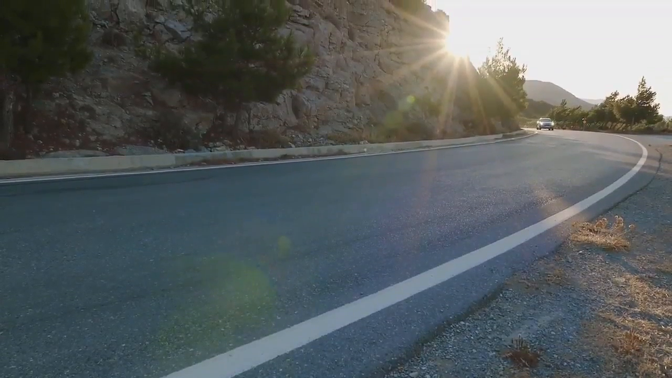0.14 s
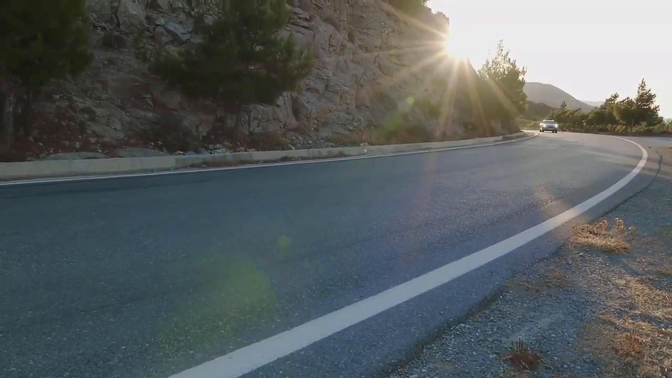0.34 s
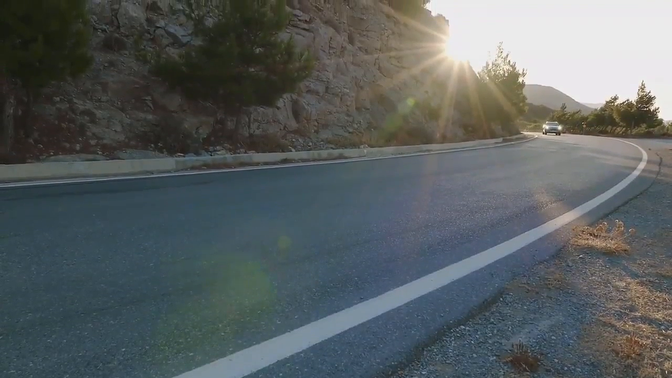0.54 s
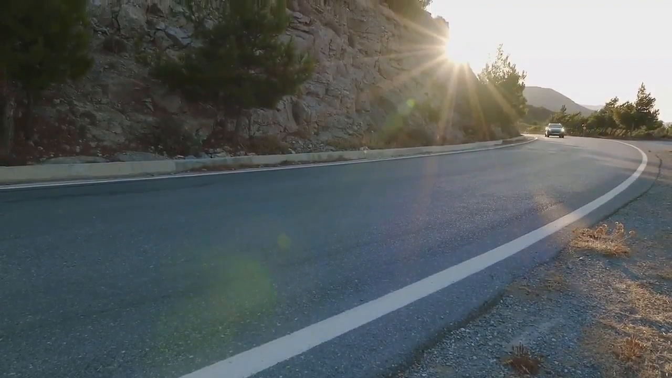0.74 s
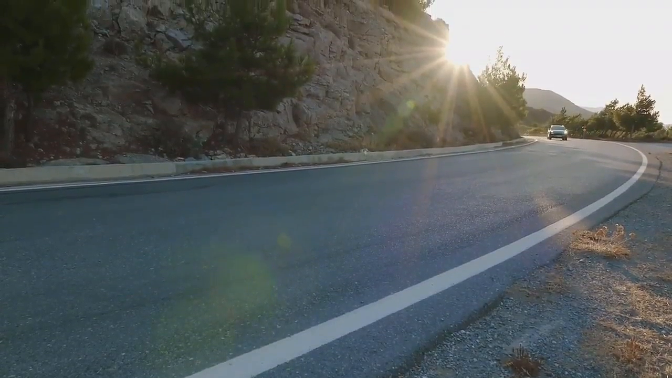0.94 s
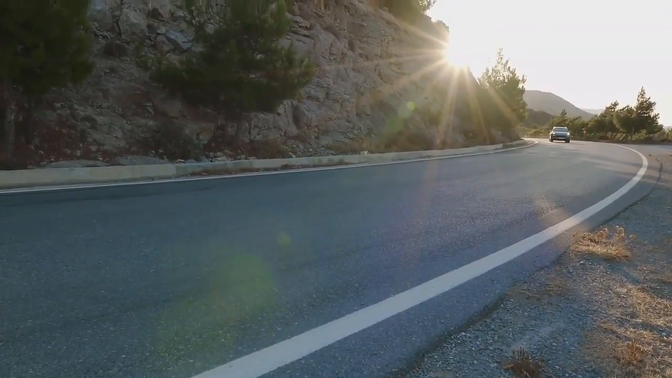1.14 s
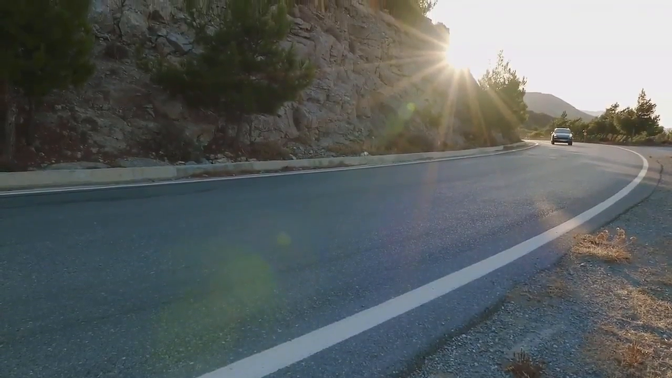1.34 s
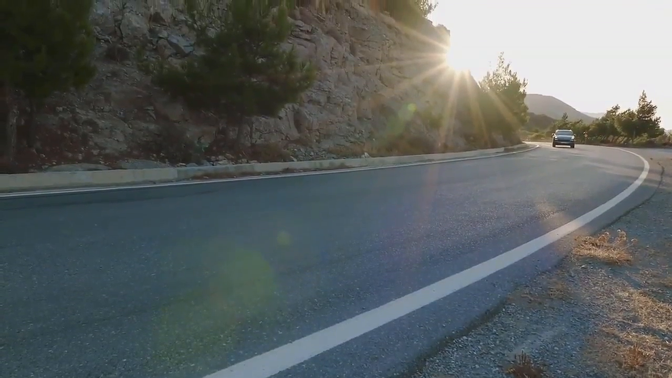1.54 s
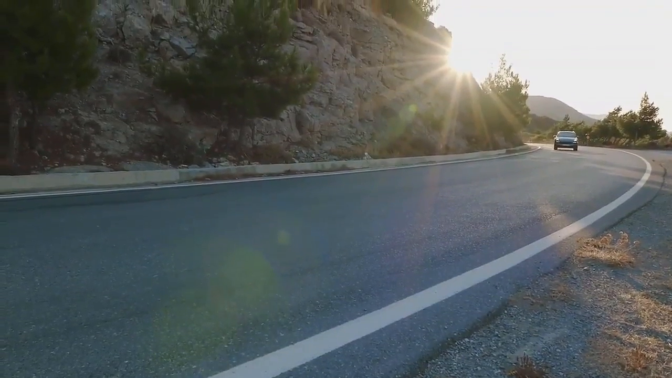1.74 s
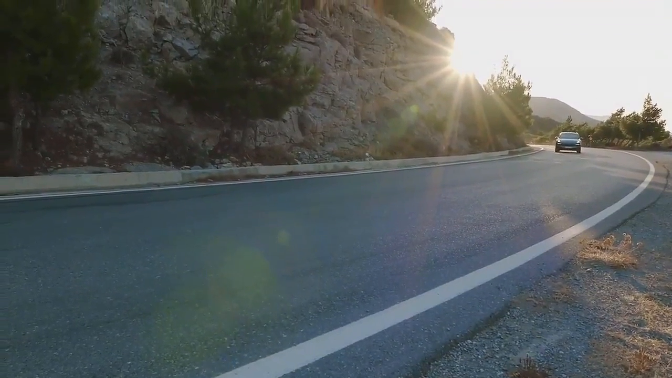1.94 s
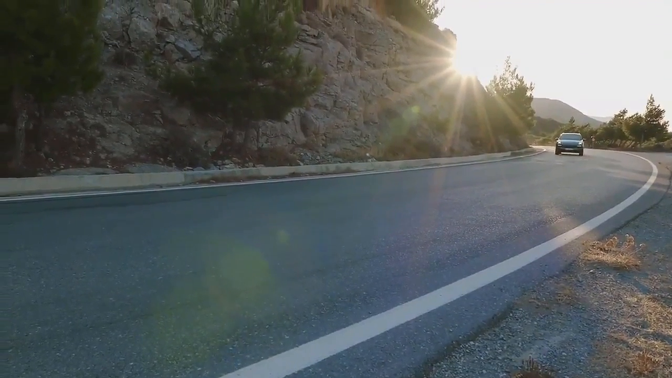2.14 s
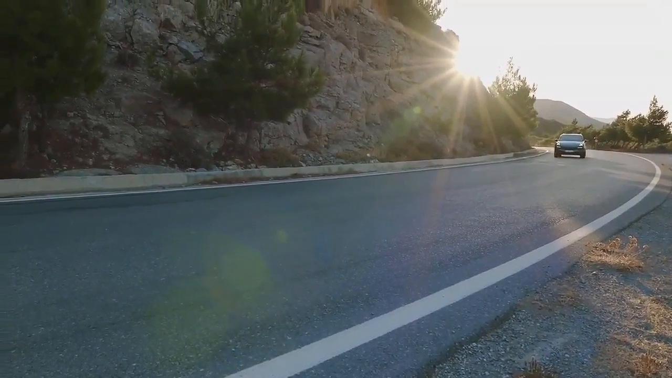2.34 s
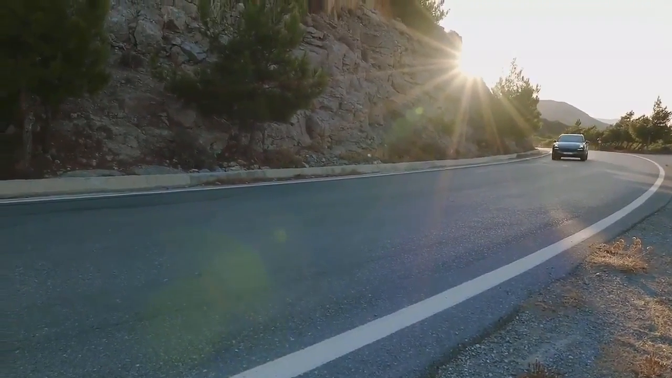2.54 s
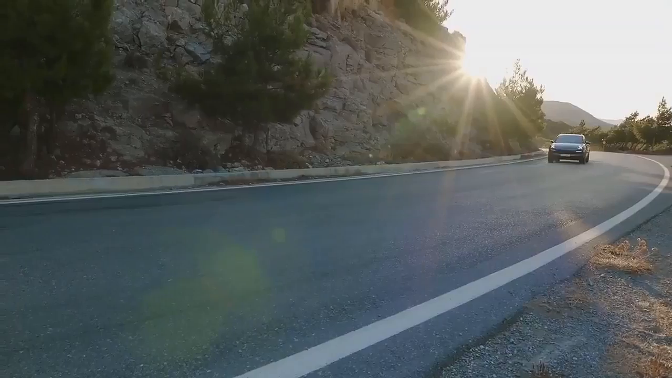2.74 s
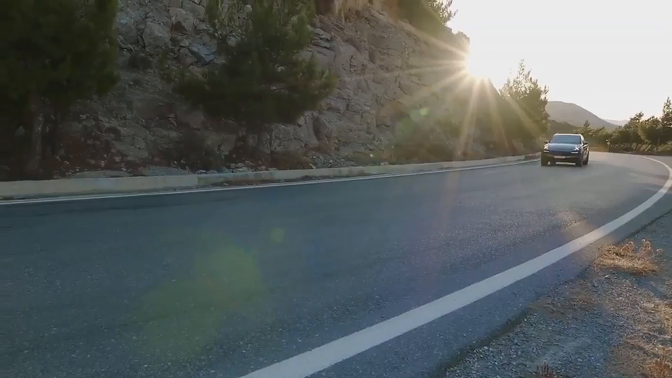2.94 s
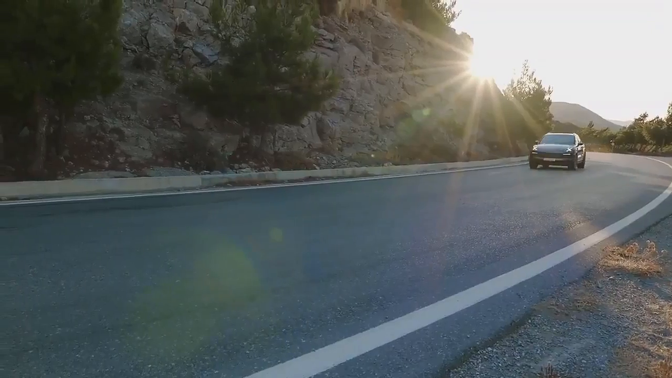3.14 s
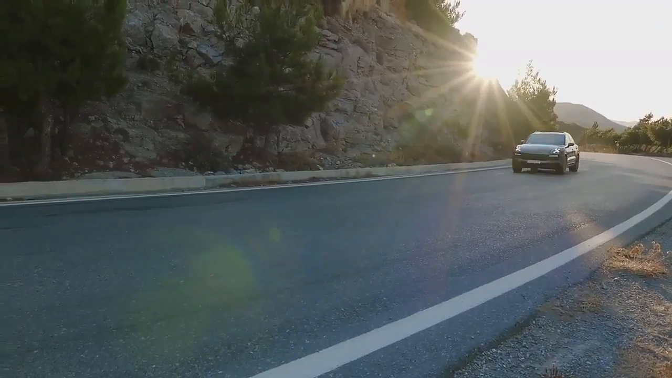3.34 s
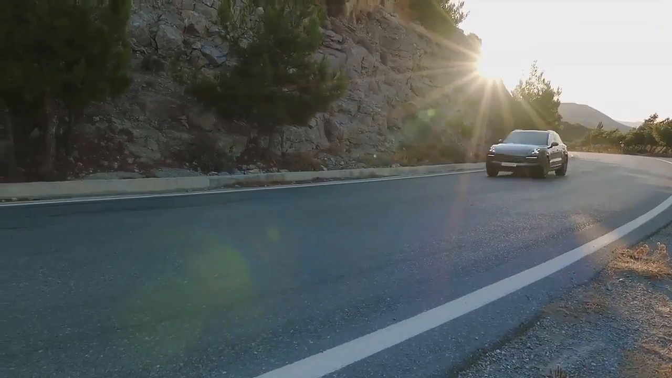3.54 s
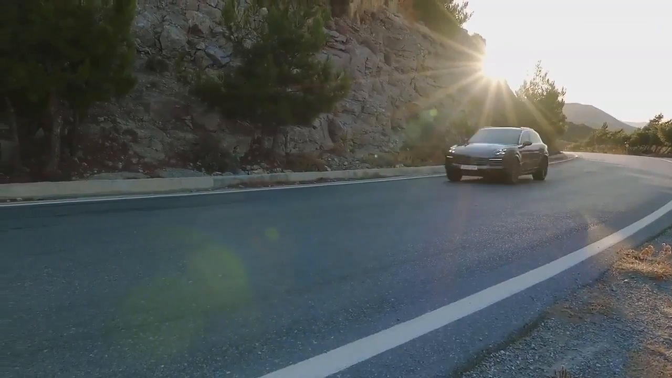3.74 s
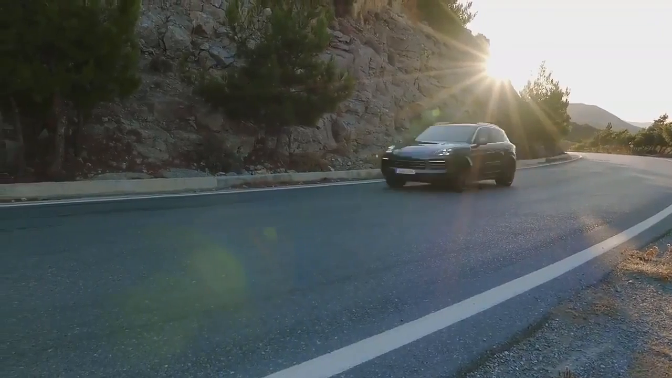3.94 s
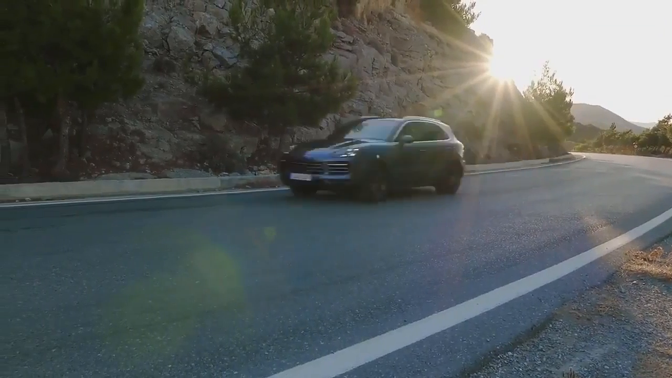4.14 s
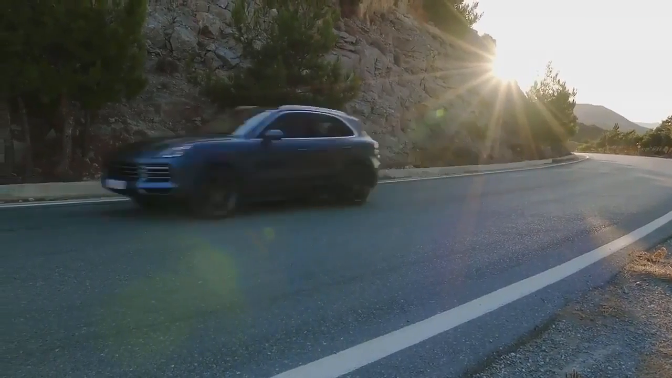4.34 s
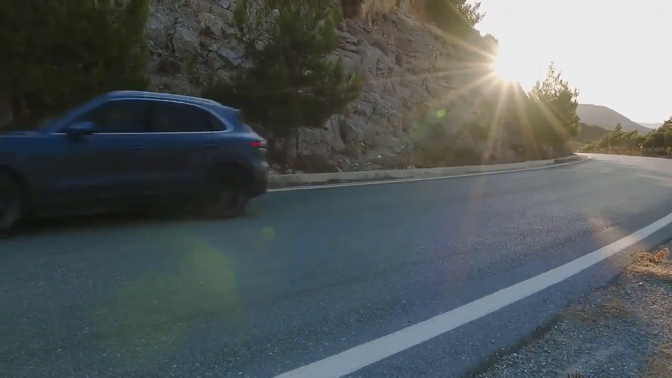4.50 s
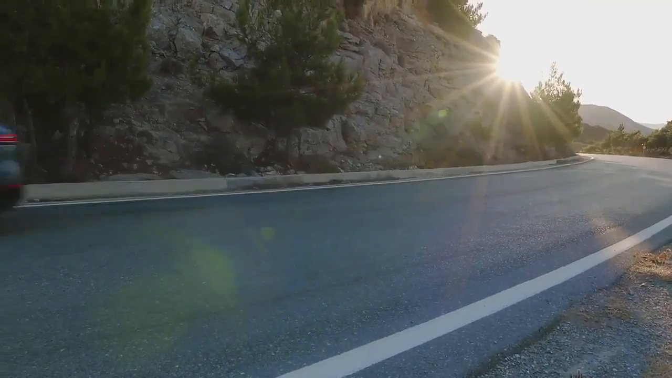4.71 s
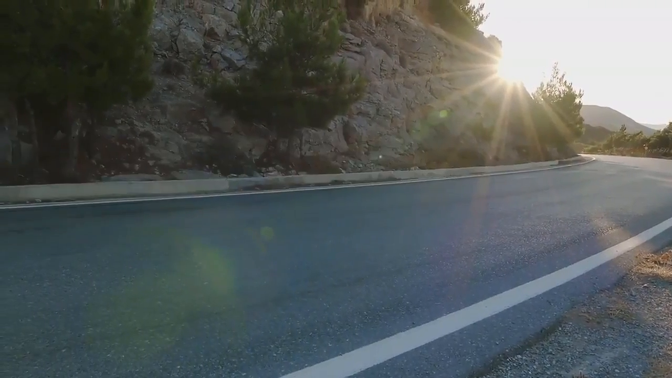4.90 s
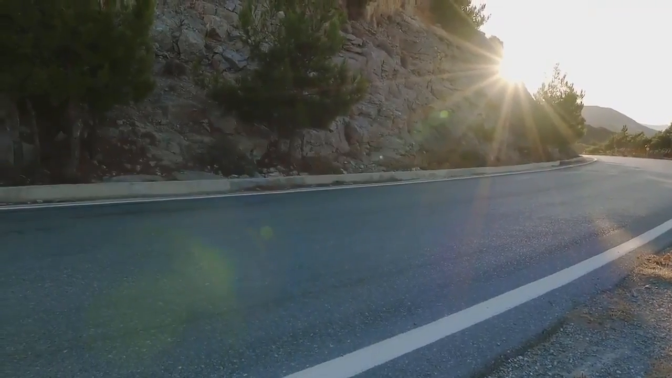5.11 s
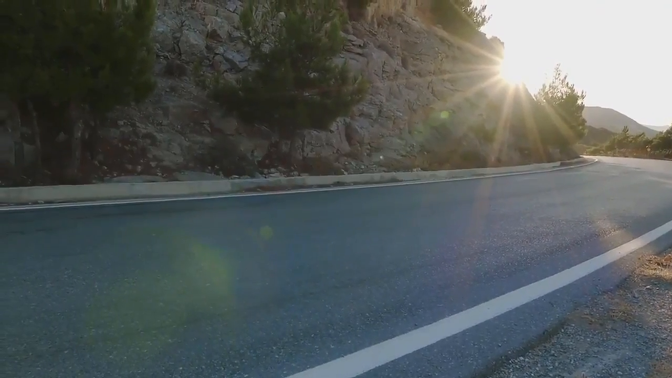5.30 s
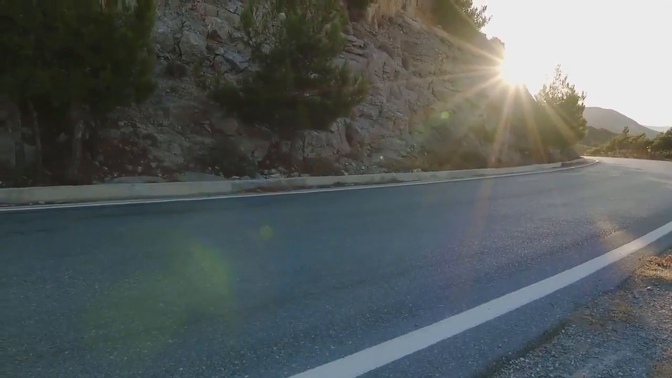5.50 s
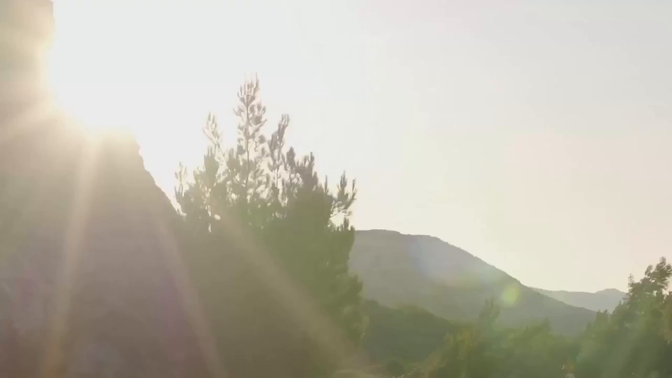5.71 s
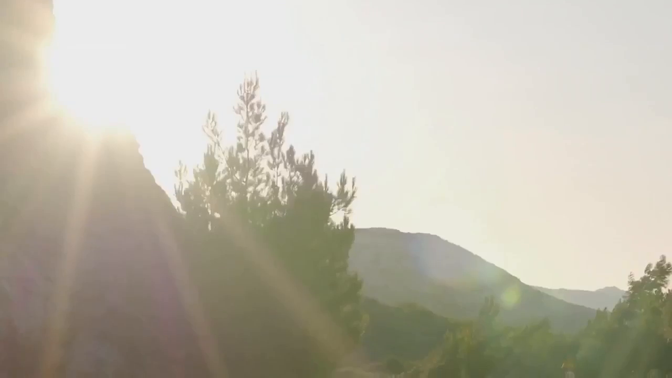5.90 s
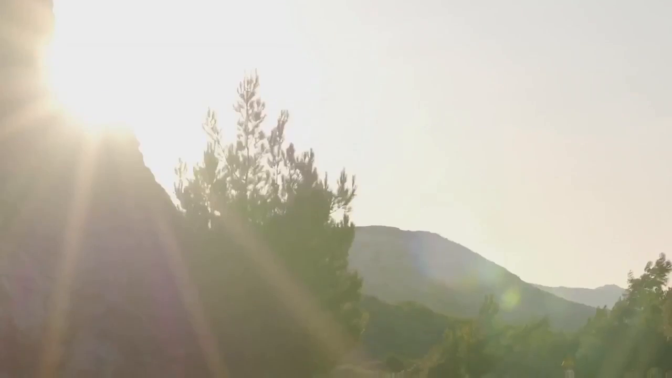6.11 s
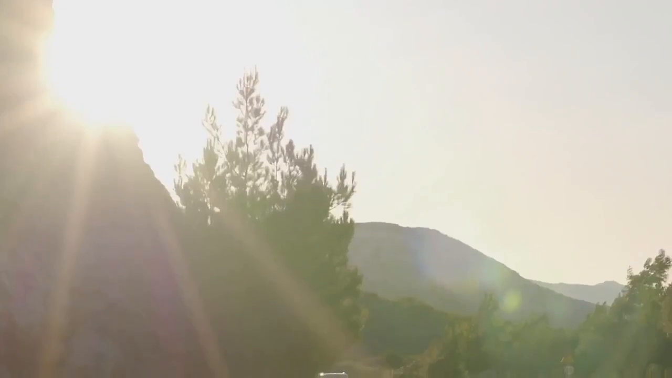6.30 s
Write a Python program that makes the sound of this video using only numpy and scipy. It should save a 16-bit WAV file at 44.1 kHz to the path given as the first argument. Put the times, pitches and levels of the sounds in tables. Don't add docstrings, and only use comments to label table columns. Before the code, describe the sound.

A heavy car sweeps round a roadside bend, tyre roar swelling to a peak and sinking away, then a stone tick and a quieter distant hum.

```python
import sys
import numpy as np
from scipy import signal
from scipy.fft import rfft, irfft, next_fast_len
from scipy.io import wavfile
from scipy.ndimage import uniform_filter1d, map_coordinates

SR = 44100
rng = np.random.default_rng(int(sys.argv[2]) if len(sys.argv) > 2 else 0)


def inscribe(sig):
    pcm = np.round(np.clip(np.atleast_2d(sig).T, -1, 1) * 32767)
    wavfile.write(sys.argv[1], SR, pcm.astype(np.int16))


def gain_from_decibels(decibels):
    exponent = np.asarray(decibels, float) / 20
    return 10 ** exponent


N = 280476
T = np.arange(N) / SR

# (time [s], level [dB], clearness of the path past rock, verge and body [dB])
TYRE_LEVEL = [(0, -36.5, 5.5), (.45, -35.5, 5.5), (.8, -33, 4), (1.15, -32.5, -1), (1.7, -32.5, -2),
              (2.1, -32.5, 0.5), (2.5, -29.5, 3), (3.0, -28.5, 2), (3.5, -25, 0.5), (4.0, -21, 1.5),
              (4.15, -21.5, 0.5), (4.3, -19.5, -2.5), (4.5, -18, -0.5), (4.78, -19.5, 0), (4.93, -22.5, 2),
              (5.1, -23.5, -3.5), (5.4, -27.5, -2.5), (5.68, -31, -5)]
# (time [s], level [dB], treble tilt [dB per octave])
CHIP_HITS = [
    (5.5040, -33, 0),
    (5.5066, -36, -2),
    (5.5085, -50, 0),
    (5.5112, -52, 2),
    (5.5148, -54, 5),
]
FADE_END_S, FADE_S = 5.89, 0.28


def curves(table):
    s, *columns = np.transpose(table)
    return [np.interp(T, s, column) for column in columns]


def swells(t, table):
    return sum(db * np.exp(-((t - at) / width) ** 2) for at, width, db in table)


def walk(rate_hz):
    hold = int(SR / rate_hz)
    steps = np.repeat(rng.standard_normal(N // 100), hold)[:N]
    return 1.194 * uniform_filter1d(uniform_filter1d(steps, hold), hold)


def roar(colour, flicker_db, rate_hz, loss_db_khz=0.):
    size = next_fast_len(N)
    octave = np.log2(np.maximum(np.arange(size // 2 + 1) * SR / size, 1))
    hz, db = np.transpose(colour)
    gain = gain_from_decibels(np.interp(octave, np.log2(hz), db, left=-90, right=-90))
    spectrum = rfft(rng.standard_normal(size)) * gain
    power = np.mean(irfft(spectrum, size) ** 2)
    out = 0
    for centre in np.arange(np.log2(hz[0]), np.log2(hz[-1]) + .5, .5):
        window = np.cos(np.pi * np.clip(octave - centre, -.5, .5)) ** 2
        band_db = flicker_db * walk(rate_hz) - loss_db_khz * max(2 ** centre / 1000 - 4, 0)
        out = out + gain_from_decibels(band_db) * irfft(spectrum * window, size)[:N]
    return out / np.sqrt(power)


def ring(s, hz, db, t60_s, push_s):
    start = int(np.ceil(s * SR))
    age = np.arange(start, min(start + int(2 * t60_s * SR), N)) / SR - s
    envelope = (1 - np.exp(-age / push_s)) * np.exp(-np.log(1000) * age / t60_s)
    out = np.zeros(N)
    out[start:start + len(age)] = gain_from_decibels(db) * envelope * np.sin(2 * np.pi * hz * age)
    return out


def slice_filter(x, order, edges_hz):
    return signal.sosfilt(signal.butter(order, edges_hz, "band", fs=SR, output="sos"), x)


def motion():
    speed_m_s, passes_s, kerb_m, pitch_abeam = 17, 4.6, 7, 0.98
    along = speed_m_s * (T - passes_s)
    cosine = along / np.hypot(along, kerb_m)
    pitch = pitch_abeam - cosine * speed_m_s / 343
    return np.maximum(-along, 0), np.maximum(along, 0), (1 + cosine) / 2, pitch


def beam(abeam_db, ahead_db_10m, behind_db_10m, away_db, clear_share):
    ahead, behind, away, _ = motion()
    level_db, clear_db = curves(TYRE_LEVEL)
    distance_db = (ahead_db_10m * ahead + behind_db_10m * behind) / 10
    return level_db + abeam_db + distance_db + away_db * away + clear_share * clear_db


def horn():
    # (frequency [Hz], density [dB per Hz])
    colour = [(400, -18.5), (550, -3.5), (680, -2), (800, -4.5), (900, -1.5), (1050, -1.5), (1300, -17.5),
              (1700, -12)]
    # (time [s], width [s], change [dB])
    openings = [(.3, 0.22, 0.5), (2.2, 0.15, 1), (3.75, 0.049, -6.5), (4.22, 0.14, 2.5), (3.2, 0.11, -0.5),
                (3.95, 0.092, -2), (4.45, .1, -1.5), (4.6, 0.06, 1), (5.12, .08, -6), (5.7, 0.063, 3)]
    return roar(colour, 2.6, 22), beam(-4.5, 0.2242, -0.6, -0.4, -0.5) + swells(T, openings)


def groove():
    # (frequency [Hz], density [dB per Hz])
    colour = [(600, -31), (700, -8.5), (750, -0.5), (810, -1.5), (870, -0.5), (920, -5), (980, -13.5),
              (1150, -35)]
    # (time [s], pitch factor)
    bend = [(0, 1.02), (.75, 1.03), (1.05, .97), (1.4, 1.01), (2.1, 0.97), (2.7, .99), (3.4, 1.01),
            (4.2, 1.013), (6.36, 1.0)]
    # (time [s], width [s], change [dB])
    sweeps = [(.65, 0.12, 2), (.92, 0.25, 2.5), (1.95, 0.27, 3.5), (2.8, 0.089, 2.5), (3.2, 0.49, 1),
              (4.15, 0.13, 4), (4.5, .06, 2.5), (4.76, .06, -5)]
    place = np.cumsum(curves(bend)[0])
    note = map_coordinates(roar(colour, 0.7, 24.63), [place], order=1, mode="mirror")
    return note, beam(-5.5, 0.3, -2, -3.5, -0.3) + swells(T, sweeps)


def rumble():
    # (frequency [Hz], density [dB per Hz])
    colour = [(40, -68), (100, -27), (160, -15), (220, -2), (320, -1.5), (450, -2), (600, -2), (800, -3.5),
              (1100, -41)]
    # (time [s], width [s], change [dB])
    rock = [(.6, 0.16, 1.5), (2.15, 0.24, 2.5), (3.75, 0.086, 2.5), (4.38, 0.16, 2), (4.6, 0.051, -1),
            (4.93, 0.064, 6.5), (5.15, 0.051, -5)]
    return roar(colour, 0.63, 17.0), beam(-5.5, -0.13, -1.5, 0.5, -0.65) + swells(T, rock)


def tread_beam():
    return beam(-5.5, 0.4228, -0.5, 0.5, -0.14)


def tread():
    # (frequency [Hz], density [dB per Hz])
    colour = [(800, -16.5), (1100, 3.5), (1300, 3.5), (1550, 2), (1800, -2), (2200, -9), (2800, -11.5),
              (3600, -25.5)]
    # (time [s], width [s], change [dB])
    openings = [(.1, 0.27, 1.8), (1.25, .1, -0.3), (3.2, 0.26, -1.5), (3.75, 0.12, -0.3), (4.2, 0.15, -0.5),
                (4.45, 0.061, 0.4), (4.8, 0.18, -2.3), (5.85, .06, 5), (2.7, 0.1, 0)]
    return roar(colour, 0.45, 13), tread_beam() + swells(T, openings)


def hiss():
    # (frequency [Hz], density [dB per Hz])
    colour = [(1800, -9), (2600, -1.5), (3200, -1), (3800, -1.5), (4500, -6), (5200, -9.5), (7000, -14.5),
              (10000, -21.5), (13000, -27), (15500, -34)]
    # (time [s], width [s], change [dB])
    openings = [(.05, 0.1, -3.5), (.85, .15, -1), (1.3, 0.18, -2), (3.2, .12, 0), (4.0, .08, 0),
                (4.4, 0.14, 2.5), (5.15, 0.06, -1), (5.6, .12, 1)]
    # (time [s], width [s], treble kept [dB per kHz])
    sheen = [(.2, .15, -0.5), (1.0, 0.36, 0), (1.9, 0.42, 0.55), (2.7, .25, 0), (4.25, 0.23, 0.23),
             (5.0, 0.13, -.5), (5.75, .1, 0.7)]
    ahead, _, away, _ = motion()
    loss_db_khz = 0.42 * ahead / 10 + 0.07 * away + 0.02 * curves(TYRE_LEVEL)[1] - swells(T, sheen)
    return roar(colour, 0.81, 10, loss_db_khz), beam(-17.5, -0.44, -3.5, 4, 0.78) + swells(T, openings)


def wake():
    # (frequency [Hz], density [dB per Hz])
    colour = [(1500, -20), (1900, 3.5), (2300, 1), (2900, -7.5), (3300, -10), (3800, -30.5)]
    # (time [s], width [s], change [dB])
    openings = [(.1, .3, -3), (1.15, .12, -3), (3.4, .2, -3), (4.8, .08, -0.5), (5.15, .08, -1.5),
                (5.5, .15, 2), (5.78, .06, -3)]
    away = motion()[2]
    away_db = 20 * np.log10(np.clip(away + 0.099, .02, 1) ** 0.51)
    return roar(colour, 0.55, 7.8), tread_beam() + swells(T, openings) - 7 + away_db


def tyres():
    asphalt_ms, asphalt_share, grazing_m = 0.092, 0.52, 120
    ahead, _, _, pitch = motion()
    place = np.cumsum(pitch)
    direct = 0
    for sound, level_db in (horn(), groove(), rumble(), tread(), hiss(), wake()):
        direct = direct + gain_from_decibels(level_db) * map_coordinates(sound, [place], order=3, mode="mirror")
    fade = np.clip((FADE_END_S - T) / FADE_S, 0, 1) ** 1.06
    direct = direct * gain_from_decibels(0.57 * walk(30)) * fade
    late = map_coordinates(direct, [np.maximum(np.arange(N) - asphalt_ms * SR / 1000, 0)], order=3)
    share = np.clip(asphalt_share * np.tanh(ahead / grazing_m), 0, .9)
    return (direct + share * late) / np.sqrt(1 + share ** 2)


def bumps():
    # (time [s], peak level [dB], frequency [Hz])
    joints = [(1.752, -13, 760), (2.291, -16, 900), (2.341, -15, 834), (2.586, -10.5, 792),
              (3.314, -12, 877), (3.639, -16, 781), (4.0, -8, 920), (4.446, -7.5, 894), (4.652, -8, 988),
              (2.895, -8.5, 833), (3.493, -2.5, 853), (3.695, -6.5, 760.6), (3.852, -3.5, 737),
              (4.041, -5.5, 850), (4.138, -6.5, 910), (4.279, -10, 840), (4.305, -4, 683),
              (4.534, -5, 643.4), (4.76, -3.5, 786), (4.781, -3.5, 920)]
    return sum(ring(s, hz, db, t60_s=0.032, push_s=0.0032) for s, db, hz in joints)


def narrow_swells():
    # (time [s], width [s], frequency [Hz], level [dB])
    flashes = [(.95, .3, 5240, -67), (1.2, .08, 5500, -67), (.05, .06, 4300, -65), (1.8, .2, 3500, -61),
               (2.4, .1, 4400, -61), (3.0, 0.22, 3660, -53.5), (4, .08, 2400, -42), (4.25, .1, 3500, -48),
               (4.3, .12, 6000, -52), (4.55, 0.069, 1770, -30), (4.85, .08, 4700, -47),
               (5.0, .05, 3000, -46), (5.3, 0.055, 3000, -52), (5.64, .07, 3000, -54),
               (5.68, .08, 1100, -39), (5.62, .12, 600, -38.5), (5.7, .06, 2700, -55),
               (3.7, .1, 1100, -33.5), (4.4, .1, 560, -30), (5.95, .06, 217, -50), (.9, .8, 7100, -77),
               (1.0, .15, 790, -37), (5.42, .1, 1100, -38), (4.55, .1, 7400, -52), (5.45, 0.14, 2760, -50),
               (2.55, .3, 11700, -82), (3.7, .25, 13200, -76)]
    white = rng.standard_normal(N)
    out = 0
    for s, width, hz, db in flashes:
        edges_hz = hz * 2 ** (0.18 * np.array([-1, 1]))
        band = slice_filter(white, 2, edges_hz) / np.sqrt(2 * np.ptp(edges_hz) / SR)
        out = out + gain_from_decibels(db) * np.exp(-((T - s) / width) ** 2) * band
    return out


def narrow_dips(x):
    # (time [s], width [s], frequency [Hz], change [dB])
    dips = [(.04, .1, 2800, -6), (0.37, .2, 3000, -1.5), (1.15, .12, 3100, -2.5), (1.12, 0.081, 1600, -2),
            (.9, 0.13, 620, -2.5), (2.7, 0.13, 970, -1), (3.62, .1, 218, -2.5), (4.2, 0.13, 1400, -2),
            (4.65, .1, 290, -3.5), (4.4, 0.042, 1320, -1.5), (5.15, 0.049, 620, -2),
            (5.15, 0.061, 1600, -2), (5.93, .07, 1300, -5), (6.27, .1, 390, -4.5), (6.25, .08, 2800, -2),
            (6.15, .2, 660, -3), (5.1, .1, 6800, -4), (5.65, .12, 3600, -4), (3.92, .1, 290, -2),
            (3.23, 0.11, 560, -2.5), (4.0, .08, 6300, -1.5), (1.75, .3, 1950, -1.5)]
    for s, width, hz, db in dips:
        band = slice_filter(x, 1, hz * 2 ** (0.28 * np.array([-1, 1])))
        x = x + (gain_from_decibels(db * np.exp(-((T - s) / width) ** 2)) - 1) * band
    return x


def engine():
    # (time [s], level [dB])
    load = [(0, -75), (1.2, -57.5), (2, -52.5), (2.6, -57), (3.6, -53), (4.4, -60), (5.2, -42.5),
            (5.7, -63), (5.9, -85)]
    # (multiple of the firing rate, level [dB])
    orders = [(1, -14), (2, -1), (3, -22)]
    firing_hz = 98.9 * motion()[-1]
    db = curves(load)[0]
    phase = 2 * np.pi * np.cumsum(firing_hz * (1 + 0.01164 * walk(12))) / SR
    return sum(gain_from_decibels(db + order_db + 0.99 * walk(4.5)) * np.sin(k * phase) for k, order_db in orders)


def chip():
    # (frequency [Hz], level [dB])
    modes = [(5900, -0.5), (7100, -12), (8300, 1.5), (9900, -7), (11200, -15), (12200, -13), (13400, -11),
             (14400, -22)]
    # (time [s], level [dB], treble tilt [dB per octave])
    grit = [
        (5.225, -68, 0),
        (5.255, -70, 0),
        (5.864, -84, -1),
        (5.886, -75, 0),
    ]
    contact_s = .00055
    hz, mode_db = np.transpose(modes)[:, :, None]
    out = np.zeros(N)
    for s, db, tilt_db in CHIP_HITS + grit:
        near = int(s * SR) + np.arange(-128, 128)
        age = near / SR - s
        level = gain_from_decibels(db + mode_db + tilt_db * np.log2(hz / hz[0]))
        bell = np.exp(-(age / contact_s) ** 2)
        out[near] += np.sum(level * bell * np.sin(2 * np.pi * hz * (age + contact_s)), axis=0)
    return out


def crunch():
    age = T - CHIP_HITS[0][0]
    grit = slice_filter(rng.standard_normal(N), 3, (8500, 14600))
    return (age > 0) * gain_from_decibels(-58 - 60 * np.maximum(age, 0) / .09) * grit


def wind():
    # (frequency [Hz], density [dB per Hz])
    colour = [(20, -1), (40, -6.5), (70, 3.5), (120, 7.5), (170, -23.5), (260, -34)]
    # (start [s], hold [s], level [dB])
    puffs = [(0, 0.11, -65), (0.898, 0.34, -60), (1.45, .08, -67.5), (1.8, .03, -77), (1.97, 0.018, -70),
             (2.13, .05, -78), (2.76, .1, -67), (3.099, .3, -74), (3.7, .05, -70), (3.97, .04, -62),
             (4.302, .05, -66), (4.57, .04, -60), (4.979, 0.049, -61), (5.12, 0.086, -70),
             (5.504, 0.054, -57), (5.68, .04, -66), (5.8, .1, -74), (2.92, .06, -74), (2.4, .05, -68),
             (4.8, .05, -62), (5.3, .05, -64)]
    attack_s, release_db_s, calm_db = .03, 151, -86.5
    gusts = 0
    for s, hold, db in puffs:
        rise = np.clip((T - s) / attack_s + 1, 0, 1)
        gusts = gusts + rise * gain_from_decibels(db - release_db_s * np.maximum(T - s - hold, 0))
    draught = gain_from_decibels(curves(TYRE_LEVEL)[0] - 50) * np.clip((FADE_END_S - T) / FADE_S, 0, 1)
    return (gusts + draught + gain_from_decibels(calm_db)) * gain_from_decibels(-4.5) * roar(colour, 3, 11.0)


def verge():
    # (frequency [Hz], density [dB per Hz])
    colour = [(4000, -9), (5500, -3), (7000, 0.5), (8500, -10.5), (11000, -9.5), (14000, -22.5)]
    # (time [s], width [s], change [dB])
    breeze = [(.2, 0.16, -3.5), (1.1, 0.26, 3), (1.9, 0.34, 1.5), (2.75, .2, -3)]
    fade = np.clip((FADE_END_S - T) / 0.085, 0, 1)
    return gain_from_decibels(-71 + swells(T, breeze)) * fade * roar(colour, 1.1, 8)


def knock():
    # (time [s], frequency [Hz], level [dB], t60 [s], push [s])
    thud = [
        (6.062, 72, -60, .15, .012),
        (6.085, 104.6, -47.5, 0.22, .02),
    ]
    return sum(ring(*mode) for mode in thud)


def far_road():
    # (frequency [Hz], density [dB per Hz])
    colour = [(70, -36), (120, -18), (170, -11.5), (225, -1), (320, -5.5), (480, -7.5), (650, -9.5),
              (900, -2), (1100, -6), (1500, -6.5), (2050, -19.5), (3800, -27.5), (6000, -41.5),
              (10000, -49.5), (15700, -52)]
    # (time [s], width [s], change [dB])
    drift = [(5.92, .07, 0), (6.1, .05, 0), (6.22, 0.057, 0)]
    fade_s, nears_db_s = 0.19, 0.5
    age = T - 5.63
    level_db = -42.5 + nears_db_s * (age - fade_s) + swells(T, drift)
    return np.clip(age / fade_s, 0, 1) * gain_from_decibels(level_db) * roar(colour, 0.76, 9)


def scene():
    road = narrow_dips(tyres() + bumps() + far_road())
    close = chip() + crunch() + wind() + knock()
    return (road + narrow_swells() + engine() + close + verge())[None]


def microphone(x):
    # (frequency [Hz], gain [dB])
    port = [(2900, .5), (3120, 1.5), (3300, -1.5), (3600, 0), (4300, 2.5), (4650, 2), (4900, 0), (6500, 0)]
    size = next_fast_len(N + 1024)
    hz, db = np.transpose(port)
    octave = np.log2(np.maximum(np.arange(size // 2 + 1) * SR / size, 1))
    gain = gain_from_decibels(np.interp(octave, np.log2(hz), db))
    return irfft(rfft(np.pad(x, (0, size - N), "reflect")) * gain, size)[:N]


def bright(t):
    return 1. * ((t > 2.32) & (t < 5.62))


def thin_treble(x):
    # (time [s], width [s], raise of the drop-out level [dB])
    swings = [(0, .06, -1), (.5, .2, 0), (1.0, 0.3, 4), (1.75, 0.4, 3), (2.15, .08, 0), (2.45, .2, -6),
              (2.9, .2, 0.5), (3.2, .1, -1), (3.4, .06, -4), (3.53, .06, -9), (3.65, 0.054, 0),
              (3.8, .08, -9), (3.97, .1, -5), (4.2, .1, 2), (4.38, .1, 5), (4.65, .07, -9), (4.74, .03, 3),
              (4.82, .05, -10), (4.92, 0.05, 6), (5.13, .06, 7.5), (5.36, 0.064, 1), (5.5, .03, -10),
              (5.68, .12, 4.5), (6.2, .3, -3)]
    hz, s, z = signal.stft(np.pad(x, (0, 2048), "reflect"), SR, "cosine", 2048, 1024, boundary="odd")
    power = abs(z) ** 2 + 1e-20
    band = np.arange(len(hz)) // 10
    band_hz = hz[::10, None]
    band_db = 10 * np.log10(np.add.reduceat(power, np.arange(0, len(hz), 10)) / 10)
    step_db = -93.5 + 0.97 * (10 * np.log10(power.sum(axis=0)) + 25) + 1
    step_db = step_db + swells(s, swings) + 1.5 * rng.standard_normal(len(s))
    flecks = np.where(bright(s), 4.2, 1.1) * (rng.exponential(size=band_db.shape) - 1)
    spared = 2 * np.maximum(np.where(bright(s), 10400, 9520) - band_hz, 0) / 1000
    tilt_db = 0.2 * (band_hz / 1000 - 10)
    scatter = 1.8 * rng.standard_normal(band_db.shape)
    keep = band_db - tilt_db + scatter + flecks + spared > step_db
    gain = keep * gain_from_decibels(.9 * np.clip(step_db + 2.0 - spared - band_db, 0, 18))
    gain = np.where(hz[:, None] < 7000, 1, gain[band])
    return signal.istft(z * gain, SR, "cosine", 2048, 1024)[1][:N]


def recorder_noise():
    level = gain_from_decibels(-95.5 - 12 * bright(T)) + gain_from_decibels(-64) * np.exp(-T / .003)
    return level * rng.standard_normal(N)


def low_pass(x):
    return signal.sosfilt(signal.butter(12, 15640, fs=SR, output="sos"), x)


def record(dry):
    thinned = thin_treble(microphone(dry[0]))
    mix = thinned[None] + gain_from_decibels(-82) + recorder_noise()
    return low_pass(mix)


dry = scene()
out = record(dry)
inscribe(out)
```